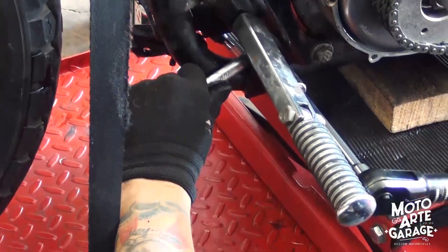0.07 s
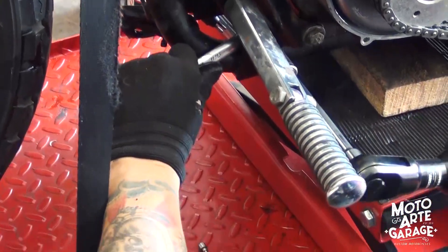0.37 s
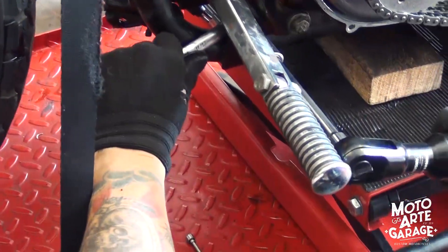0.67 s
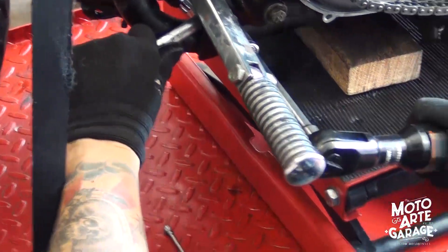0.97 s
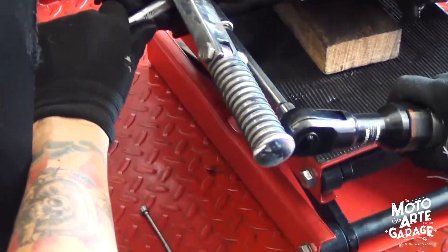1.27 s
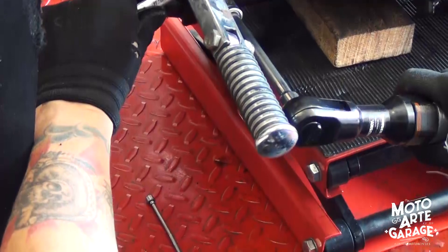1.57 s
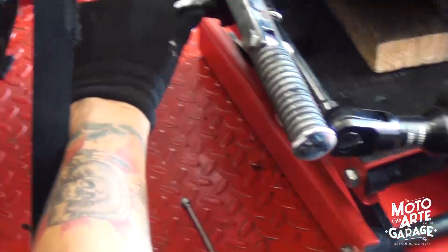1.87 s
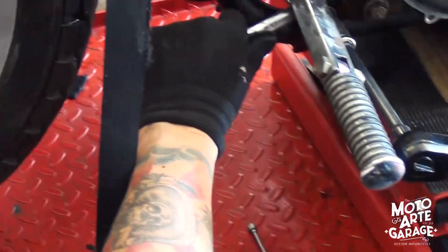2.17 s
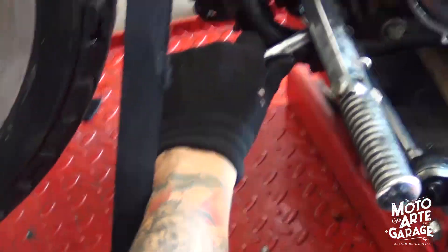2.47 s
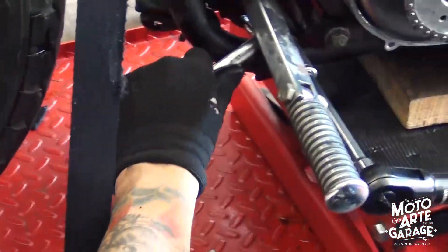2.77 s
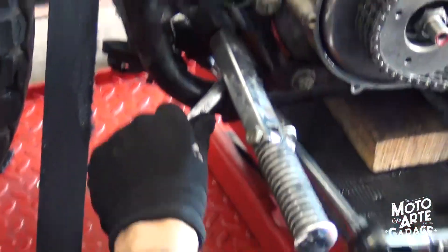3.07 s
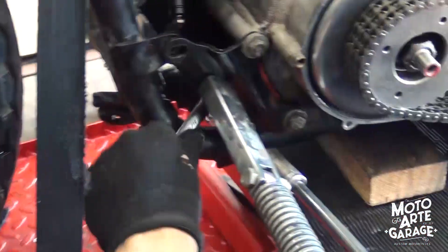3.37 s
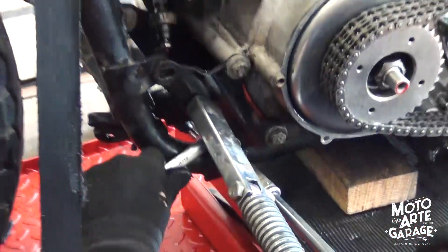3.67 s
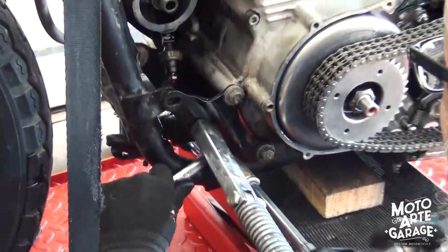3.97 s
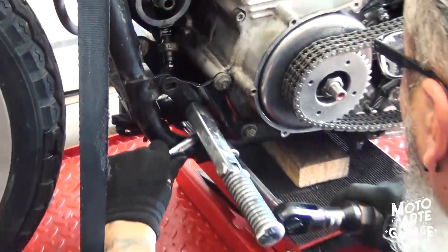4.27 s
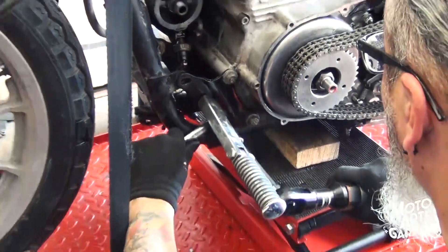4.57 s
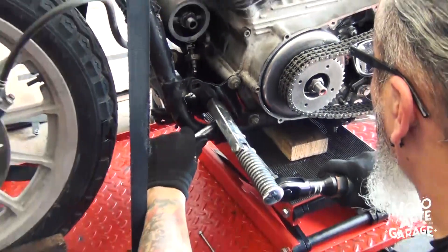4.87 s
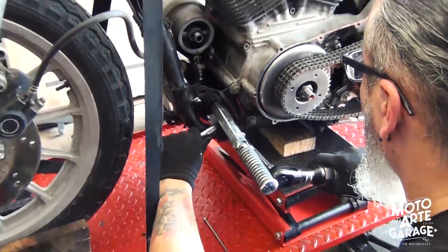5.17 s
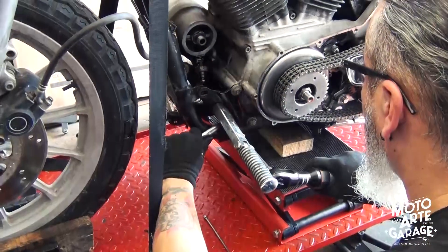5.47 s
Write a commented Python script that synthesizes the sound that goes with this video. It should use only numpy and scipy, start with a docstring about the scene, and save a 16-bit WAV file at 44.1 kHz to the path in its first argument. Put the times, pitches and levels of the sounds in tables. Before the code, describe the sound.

An air ratchet runs close to the microphone, a high, slightly wavering whine over a loud hiss of air, as it spins a motorcycle bolt. After about three seconds it stops. The air line sings faintly and the socket clinks lightly on the bolt over low workshop room tone. Then the ratchet starts again with a blast of air, its pitch higher at first and sagging.

```python
"""Air ratchet in a workshop

Close to the microphone, an air ratchet spins a bolt out of a motorcycle in two runs. Its vane motor
chops the exhaust into a siren whine over a loud hiss, and at this distance both overload the input.
Between the runs the air line sings faintly and the socket clinks on the bolt, over a low room tone."""
import sys
import numpy as np
from scipy import signal
from scipy.fft import rfft, irfft, next_fast_len
from scipy.io import wavfile

SR = 44100
rng = np.random.default_rng(int(sys.argv[2]) if len(sys.argv) > 2 else 0)


def to_wav(sig):
    """Store sig (one row per channel, or 1-D mono) as 16-bit WAV at the path in sys.argv[1].

    Samples outside -1..1 are clipped; the rate is SR.
    """
    pcm = np.clip(np.atleast_2d(sig), -1, 1) * 32767
    pcm = np.round(pcm).astype(np.int16)
    wavfile.write(sys.argv[1], SR, pcm.T)  # frames by channels


N = 252693
T = np.arange(N) / SR
RELEASE_S, PRESS_S = 2.886, 4.557  # the trigger is let go, then squeezed again
VANES_PER_STROKE, STROKES_PER_TURN = 22.8, 6  # gearing from motor to yoke to socket


def amp(db):
    """Decibels to gain."""
    return np.exp(np.asarray(db) * (np.log(10) / 20))


def unit(x):
    """Scale to rms 1."""
    return x / np.sqrt(np.mean(x ** 2) + 1e-20)


def along(points, hz):
    """Each column after the frequency, read at hz on a log axis."""
    f, *columns = np.transpose(points)
    return [np.interp(np.log(hz + 1), np.log(f + 1), column) for column in columns]


def curve(points):
    """One value per sample from (t/s, value) points."""
    return np.interp(T, *np.transpose(points))


def since(start_s):
    """Seconds after start_s, zero before it."""
    return np.maximum(T - start_s, 0)


def wobble(rate):
    """A random curve, rate knots a second."""
    knots = rng.standard_normal(int(N * rate / SR) + 2)
    return np.interp(T * rate, np.arange(len(knots)), knots)


def filtered(x, response):
    """Filter x by a gain given as a function of frequency."""
    size = next_fast_len(len(x) + 8192)
    return irfft(rfft(x, size) * response(np.fft.rfftfreq(size, 1 / SR)), size)[:len(x)]


def noise(spectrum, size=N):
    """Noise of rms 1, coloured by (f/Hz, level/dB) points."""
    return unit(filtered(rng.standard_normal(size), lambda hz: amp(along(spectrum, hz)[0])))


def trigger(rise, fall):
    """1 while the air is on; dies after the release, builds after the press (time constants in s)."""
    return np.where(T < PRESS_S, np.exp(-since(RELEASE_S) / fall), 1 - np.exp(-since(PRESS_S) / rise))


# Room tone at the microphone: t/s, level/dB
ROOM_TONE_LEVEL = [(3.0, -49.5), (3.5, -51), (3.75, -48), (4.0, -43.5), (4.25, -44.5), (4.5, -44.5)]
# Its spectrum: f/Hz, relative level/dB
ROOM_TONE_SPECTRUM = [(25, -4), (75, -5), (145, -4), (200, -8.5), (400, -8.5), (800, -14.5), (2000, -20),
                      (4000, -26.5), (8000, -38.5), (15000, -55)]

def room_tone():
    """The low, uneven rush of the workshop, behind the tool."""
    return amp(curve(ROOM_TONE_LEVEL) + .8 * wobble(14)) * noise(ROOM_TONE_SPECTRUM)


# Reverberation of the workshop: f/Hz, t60/s, level/dB
REVERB = [(200, .35, -14), (380, 0.43, -8), (550, .38, 1), (843, .38, -2), (1150, 0.55, -14),
          (2300, 0.6, -14.5), (4000, .4, -14), (14000, 0.24, -20.5)]

def workshop_echo(direct):
    """Reflections reach the microphone 5 ms after the direct sound, strongest in the low middle."""
    hz, t, spectra = signal.stft(rng.standard_normal(SR * 3 // 4), SR, nperseg=256)
    t60 = along(REVERB, hz)[0][:, None]
    _, tail = signal.istft(spectra * amp(-60 * t / t60) / np.sqrt(t60), SR, nperseg=256)
    tail = np.pad(tail / np.linalg.norm(tail), (SR // 200, 0))
    return filtered(signal.fftconvolve(direct, tail)[:N], lambda f: amp(along(REVERB, f)[1]))


# Contacts of socket and handle: t/s, clack and ring level/dB, tick level/dB
CONTACTS = [(3.027, -55, -27.5), (3.516, -29, -50), (3.521, -36, -51), (3.554, -34, -54), (3.568, -33, -48),
            (3.582, -27, -42), (3.586, -27, -42), (3.603, -36, -52), (3.640, -39.5, -53), (3.665, -29, -38),
            (4.065, -30, -49), (4.172, -26, -48), (4.178, -27, -49), (4.197, -32, -55)]
# Ringing modes of the steel: f/Hz, relative level/dB, t60/s
STEEL_MODES = [(1445, 2, .07), (1710, -3, .07), (1990.4, -3, 0.13), (2390, -8, .06), (3400, -5, 0.071),
               (3714, -5, .12), (4484, -14, .1), (5700, -8, .07), (8549, -18, .14)]
# Spectrum of the clack: f/Hz, relative level/dB
CLACK_SPECTRUM = [(180, -41), (300, -8), (800, -12.5), (1500, 2), (2720, -1.5), (3810, -1.5), (5420, -10),
                  (7360, -24), (8500, -19), (14000, -50)]

def clinks():
    """Steel meets steel near the microphone: a short clack, a bright tick and a damped ring."""
    out, t = np.zeros(N + SR), np.arange(SR // 4) / SR
    decay = lambda t60: amp(-60 * t / t60)
    tick_spectrum = [(2000, -23), (4000, -3), (8500, 1), (12000, -18), (16000, -36)]
    for start_s, clack_db, tick_db in CONTACTS:
        ring = sum(amp(db + rng.normal(0, 3.4)) * decay(t60) * np.sin(2 * np.pi * hz * t)
                   for hz, db, t60 in STEEL_MODES)
        clack = noise(CLACK_SPECTRUM, len(t)) * (decay(.026) + amp(-10.5) * decay(.25))
        tick = noise(tick_spectrum, len(t)) * decay(.044)
        clink = amp(clack_db) * (amp(-15) * ring + amp(-2.5) * clack) + amp(tick_db) * tick
        out[round(start_s * SR):][:len(t)] += clink
    return out[:N]


# Resonances of the air line: f/Hz, width/Hz, relative level/dB
HOSE_MODES = [(1200, 15, -7), (1700, 45, -3), (2013, 50, -10), (2320, 40, -6), (2660, 50, -0.5),
              (2919.5, 50, -3.5), (2850, 60, -0.5), (3780, 120, -3.5), (4510, 140, -7), (5995, 240, -7.5),
              (7400, 500, -12), (10000, 3000, -29)]

def air_line():
    """Air creeps on through the line after the valve shuts and sounds its resonances."""
    resonances = lambda f: np.sqrt(sum(amp(db) ** 2 / (1 + (2 * (f - hz) / width) ** 2)
                                       for hz, width, db in HOSE_MODES))
    age = since(RELEASE_S)
    level_db = -40.5 - 12 * age - 90 * since(RELEASE_S + .8)  # a slow sag, then a quick fade
    onset = np.minimum(age / .1, 1)
    return amp(level_db) * onset * unit(filtered(rng.standard_normal(N), resonances))


VALVE_S = 4.541  # the valve cracks open just ahead of the second run

def valve():
    """A short, unsteady edge tone from the barely open valve."""
    hold_s, edge_s = .026, .00112
    outside_s = np.abs(T - np.clip(T, VALVE_S, VALVE_S + hold_s))
    hz = 8620 + 130 * wobble(500)
    whistle = np.sqrt(2) * np.sin(2 * np.pi * np.cumsum(hz) / SR)
    return amp(-18) * np.exp(-outside_s / edge_s) * whistle


def spin_up():
    """Until the rotor is at speed, air rushes straight through it."""
    age = since(PRESS_S)
    blast = noise([(30, -4), (400, 3), (3500, -1), (9000, -12.5), (15000, -9)])
    return amp(-5) * blast * (1 - np.exp(-age / .0033)) * np.exp(-age / .031)


# Weak tones of motor and gears: multiple of the vane rate, level/dB
GEAR_TONES = [(.75, -41.5), (3.75, -31.5), (4.5, -28), (5.5, -28), (9, -29), (10, -30)]

def gears(vane_phase):
    """Motor and gears add faint tones locked to the rotor, each drifting in level."""
    tones = sum(amp(db + 3 * wobble(2.7)) * np.sin(k * vane_phase) for k, db in GEAR_TONES)
    return tones * trigger(rise=.022, fall=.006)


# Spectrum of the pawl's snap: f/Hz, relative level/dB
PAWL_SPECTRUM = [(3000, -30), (7500, -17), (9300, 2), (10500, -6), (12000, -16), (15500, -24.5)]

def pawl(vane_phase):
    """The pawl snaps over a tooth at each stroke of the yoke, dying away before the next."""
    stroke = (vane_phase / (2 * np.pi * VANES_PER_STROKE)) % 1
    snaps = unit(np.exp(-5.5 * stroke))
    return amp(-17.5) * snaps * noise(PAWL_SPECTRUM) * trigger(rise=.02, fall=.02)


# The two runs: t/s at the start, settled hiss level/dB, overtone boost/dB
AIR_RUNS = [(0, -9, 0.5), (4.557, -8.5, 3.5)]

def air_supply():
    """Hiss level and overtone boost of the current run; the hiss sinks with the line pressure."""
    fresh_db, sink_s = 2.5, 1  # extra hiss at full pressure
    start_s, hiss_db, overtone_db = np.array(AIR_RUNS)[(T > VALVE_S).astype(int)].T
    return hiss_db + fresh_db * np.exp(-since(start_s) / sink_s), overtone_db


# Spectrum of the exhaust jet, heard close: f/Hz, relative level/dB
JET_SPECTRUM = [(25, -21), (900, -20.5), (1700, -11.5), (2500, -3.5), (3300, -3.5), (4600, -1.5),
                (6000, -2.5), (7400, -3.5), (8800, -1), (9900, -3), (10800, -7), (12000, -8.5),
                (15500, -19.5)]
# Low rush of air blowing past the microphone: t/s, level/dB
WIND_LEVEL = [(0, -29), (.5, -28), (1.4, -33), (2, -52), (2.87, -34.5), (4.58, -22.5), (4.7, -20.5),
              (5.73, -22.5)]

def exhaust(vane_phase, hiss_db):
    """The jet hisses, pulsing with the vanes and the yoke's strokes, and blows past the microphone."""
    pulsing = (1 + .26 * np.cos(vane_phase)) * (1 + .1 * np.cos(vane_phase / VANES_PER_STROKE))
    leak = amp(-18.5) * ((T > 4.549) & (T < PRESS_S))  # through the opening valve
    jet = amp(hiss_db) * noise(JET_SPECTRUM) * pulsing
    wind = amp(curve(WIND_LEVEL)) * noise([(25, 2), (150, -4), (900, -8), (2000, -9.5), (5000, -39.5)])
    return (jet + wind) * (trigger(rise=.0053, fall=.032) + leak)


# The whine's fundamental as the tool moves in front of the microphone: t/s, level/dB
FUNDAMENTAL_LEVEL = [(0, -7.5), (.3, -3.5), (.55, -8), (.9, -4.5), (1.3, -6.5), (2.15, -11.5), (2.42, -9),
                     (2.87, -6), (4.7, -7), (4.9, -4.5), (5.06, -4), (5.17, -7), (5.36, -3), (5.73, -3.5)]
# Harmonics 2 to 7 before their boosts and fades: level/dB
HARMONIC_LEVELS = [-12.3, -13, -20, -21.3, -22.3, -27.5]
# Standing waves around the tool lift or cancel passing harmonics: f/Hz, half width/Hz, gain/dB
STANDING_WAVES = [(2518, 48, 10), (2760, 70, 11.5), (3528, 34, 5.5), (3640, 17, -14), (3850, 48, -22),
                  (4160, 45, -10), (4655, 28, 10), (4910, 25, 6), (5370, 70, 6), (5797, 30, 8.5),
                  (6310, 90, 6), (6935, 26, 8.5), (7066, 42, 10.5), (8145, 45, 9)]

def whine(vane_phase, vane_hz, overtone_db):
    """Each passing vane lets out a puff; the overtones need full pressure and fade first."""
    # the muffler delays each harmonic differently, which spreads the puff over the cycle
    harmonic = lambda k: np.cos(k * vane_phase + 1.5 * k * k)
    turning = 1 - np.exp(-(vane_hz / 420) ** 4)  # the tone dies as the rotor stalls
    # without air behind it the rotor judders to a stop
    judder_db = 5.5 * (1 - trigger(rise=.002, fall=.01)) * wobble(150)
    fundamental = amp(curve(FUNDAMENTAL_LEVEL) + .9 * wobble(55) + judder_db) * harmonic(1) * turning
    sharpen_db = .0045 * np.maximum(vane_hz - 1180, 0)  # faster puffs have sharper edges
    overtones = np.zeros(N)
    for k, db in enumerate(HARMONIC_LEVELS, 2):
        standing_db = sum(gain_db * np.exp(-((k * vane_hz - hz) / width) ** 2)
                          for hz, width, gain_db in STANDING_WAVES)
        unsteady_db = wobble(12) + 1.8 * wobble(40)  # fades as the hand moves, and a quick flutter
        level_db = db + overtone_db + (k - .5) * sharpen_db + standing_db + unsteady_db
        overtones += amp(level_db) * harmonic(k)
    return fundamental * trigger(rise=.013, fall=.039) + overtones * trigger(rise=.022, fall=.006)


# Rate of passing vanes, sagging as the line loses pressure: t/s, f/Hz
MOTOR_SPEED = [(0, 1240), (0.3, 1216), (0.75, 1191), (1.1, 1185), (1.45, 1182), (2, 1168), (2.45, 1163),
               (2.87, 1158), (4.6, 1421), (4.85, 1344), (5.05, 1285), (5.35, 1217), (5.73, 1154)]
# The thread catches and slows the motor for a moment: t/s, drop in vane rate/Hz
THREAD_CATCHES = [(.5, 14.84), (.61, 17.09), (4.8, 9), (4.91, 10.92), (5.25, 14.65), (5.5, 9), (5.61, 17)]

def ratchet():
    """The tool, close up: motor speed sets whine, exhaust pulse and pawl; thread drag makes it waver."""
    sway_hz, catch_half_s = 2.78, .02
    driven_hz = curve(MOTOR_SPEED)
    vane_hz = driven_hz * trigger(rise=.02, fall=.042)
    socket_turns = np.cumsum(vane_hz) / SR / (VANES_PER_STROKE * STROKES_PER_TURN)
    caught_hz = sum(hz * np.exp(-((T - s) / catch_half_s) ** 2) for s, hz in THREAD_CATCHES)
    # the drag rises and falls once for each turn of the socket
    load = (sway_hz * np.sin(2 * np.pi * socket_turns) - caught_hz) / driven_hz
    drag_depth = np.interp(T, [PRESS_S + .4, PRESS_S + .9], [.0007, .005])
    stumble = .1104 * (1 - trigger(rise=.002, fall=.02)) * wobble(250)  # once the air is off
    waver = 1 + load + drag_depth * wobble(22) + .0025 * wobble(140) + stumble
    vane_phase = 2 * np.pi * np.cumsum(vane_hz * waver) / SR
    hiss_db, overtone_db = air_supply()
    motor = whine(vane_phase, vane_hz, overtone_db) + gears(vane_phase)
    return motor + exhaust(vane_phase, hiss_db) + pawl(vane_phase) + spin_up()


def scene():
    """One microphone close to the tool, with the workshop's echo and room tone behind."""
    near = ratchet() + valve() + air_line() + clinks()
    return np.tile(near + workshop_echo(near) + room_tone(), (2, 1))


# Colour of the microphone chain after the overload: f/Hz, gain/dB
MIC_RESPONSE = [(25, -2), (900, 0), (1200, 0.5), (9500, -1), (12000, -2), (15500, -0.5)]

def record(dry):
    """The microphone's mono input flattens the peaks, colours the sound and cuts the highest treble."""
    ceiling, top_hz = .69, 15750
    clipped = np.clip(dry.mean(axis=0), -ceiling, ceiling)
    band_limit = lambda hz: .5 - .5 * np.tanh((hz - top_hz) / 70)
    response = lambda hz: amp(along(MIC_RESPONSE, hz)[0]) * band_limit(hz)
    return np.tile(filtered(clipped, response), (2, 1))


dry = scene()
out = record(dry)
to_wav(out)
```